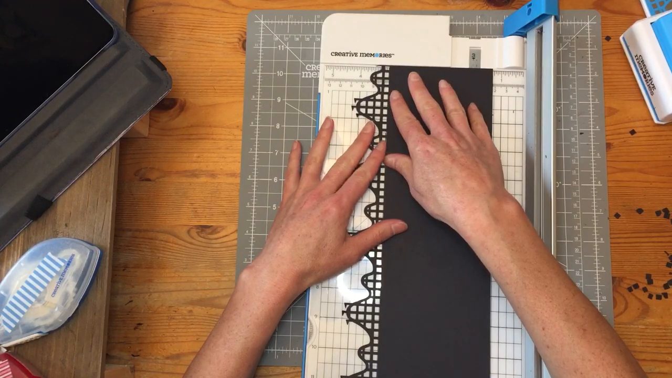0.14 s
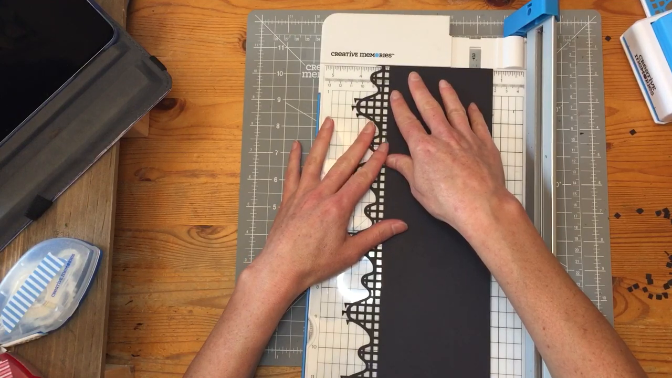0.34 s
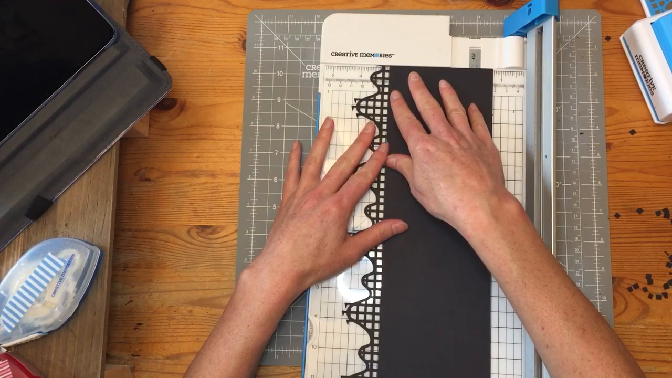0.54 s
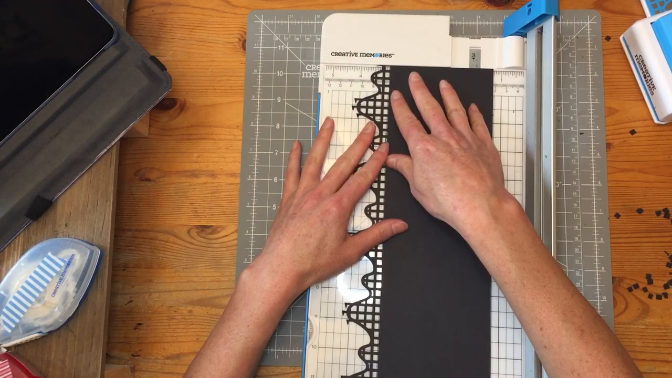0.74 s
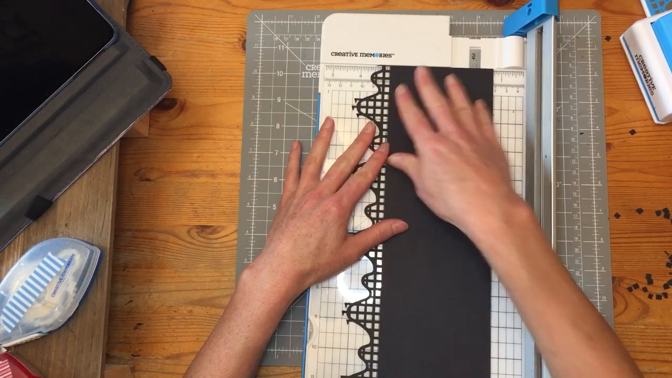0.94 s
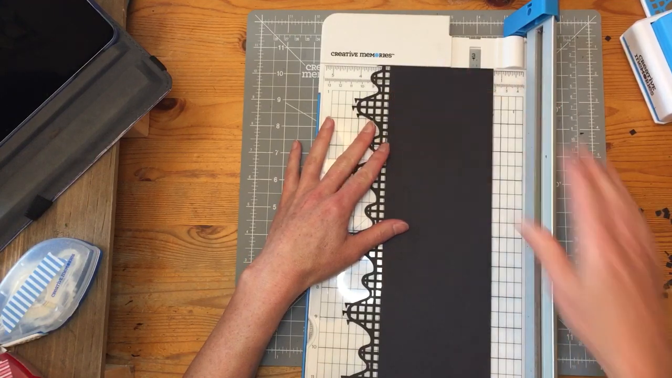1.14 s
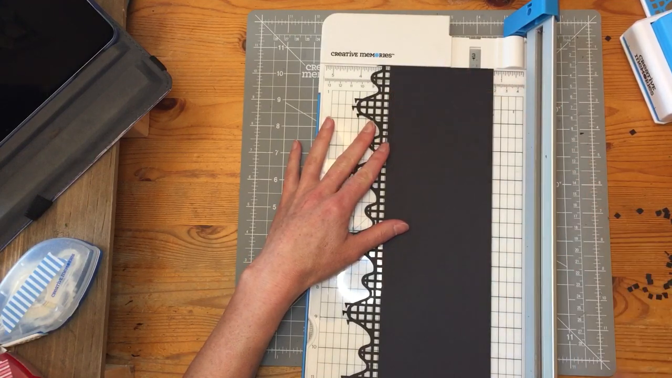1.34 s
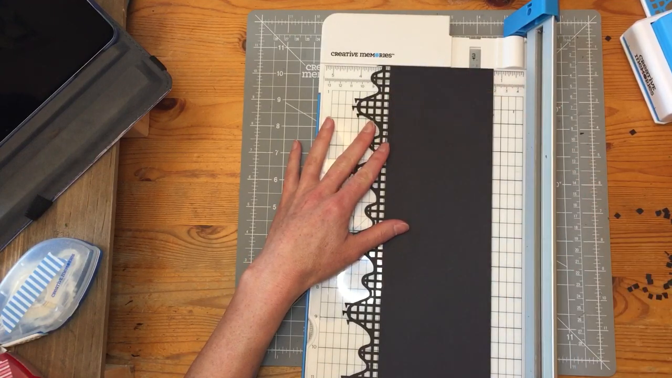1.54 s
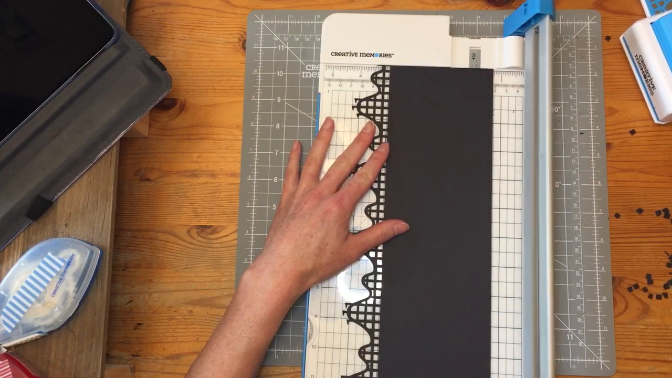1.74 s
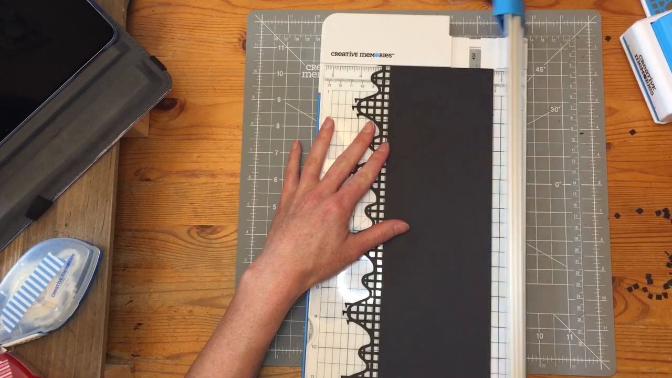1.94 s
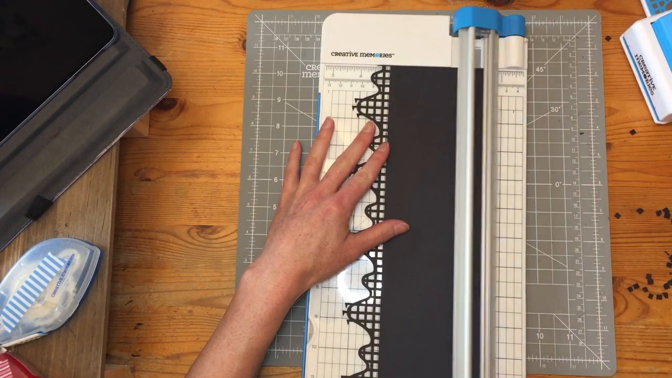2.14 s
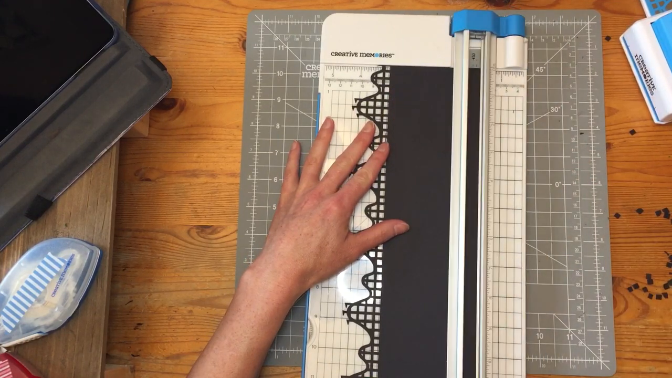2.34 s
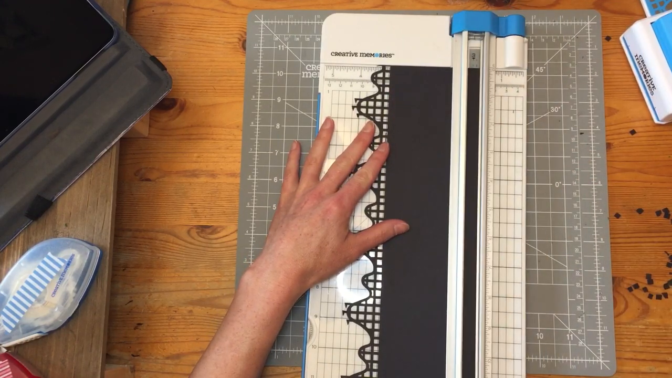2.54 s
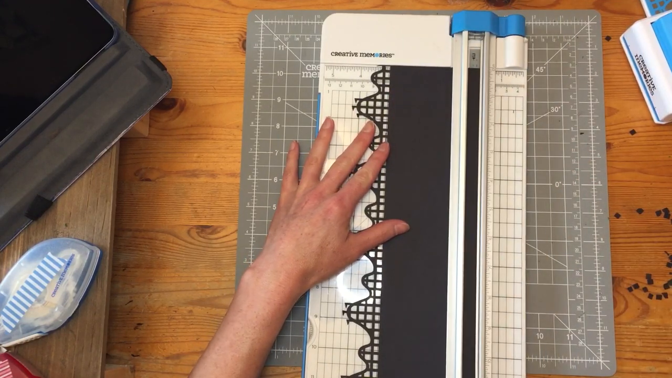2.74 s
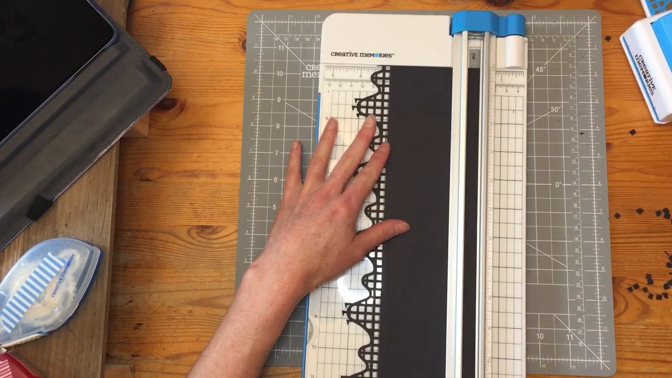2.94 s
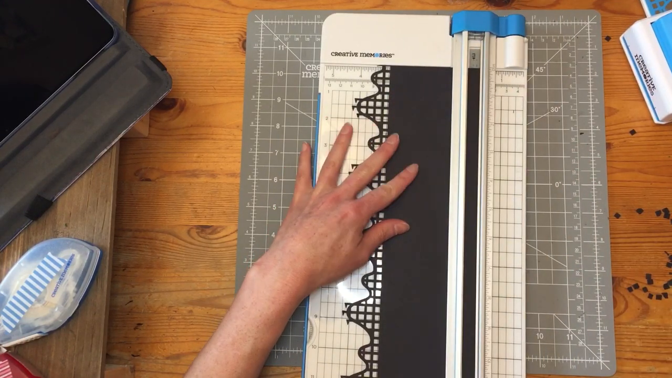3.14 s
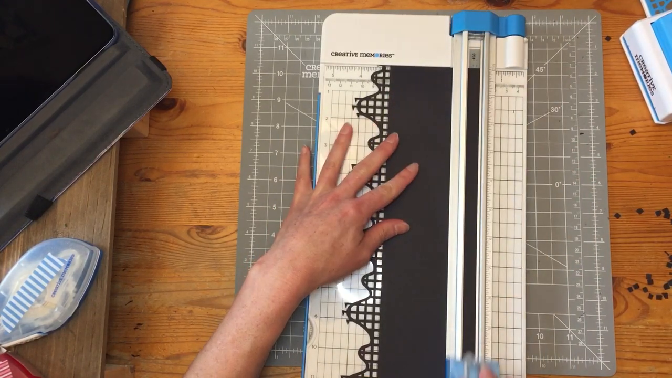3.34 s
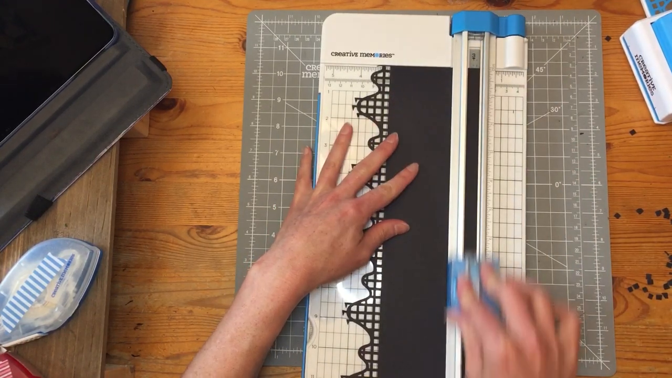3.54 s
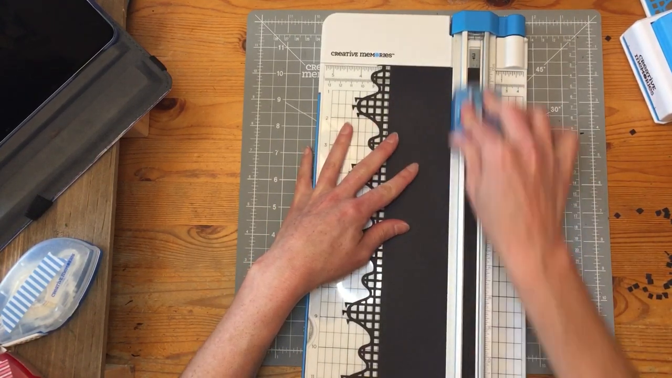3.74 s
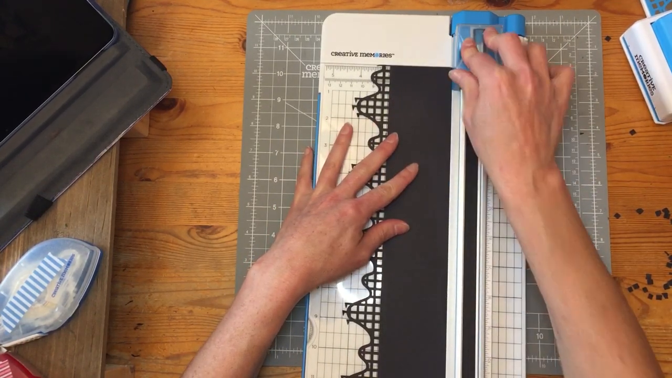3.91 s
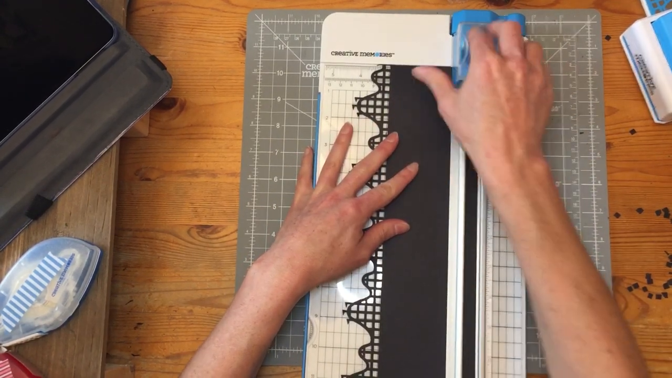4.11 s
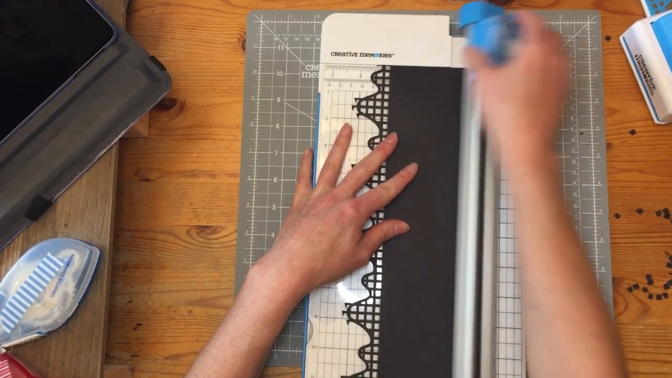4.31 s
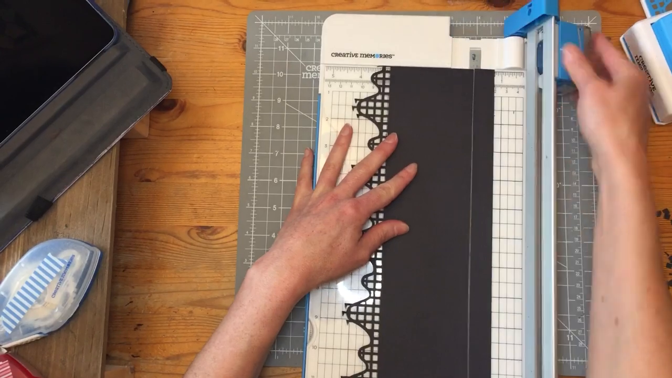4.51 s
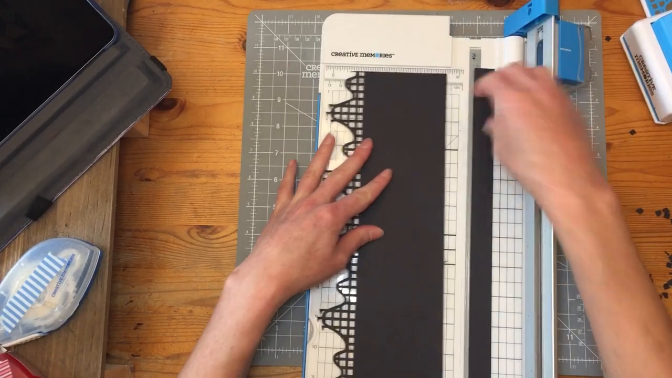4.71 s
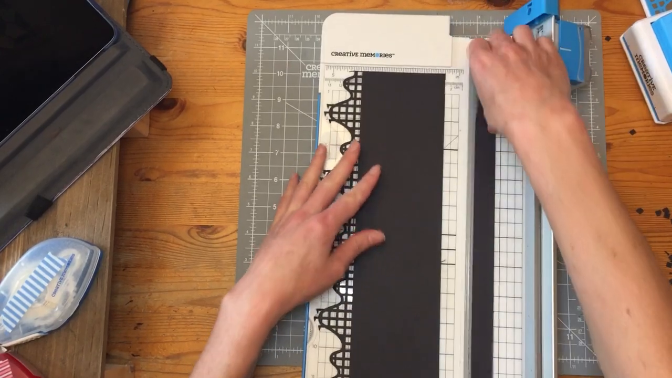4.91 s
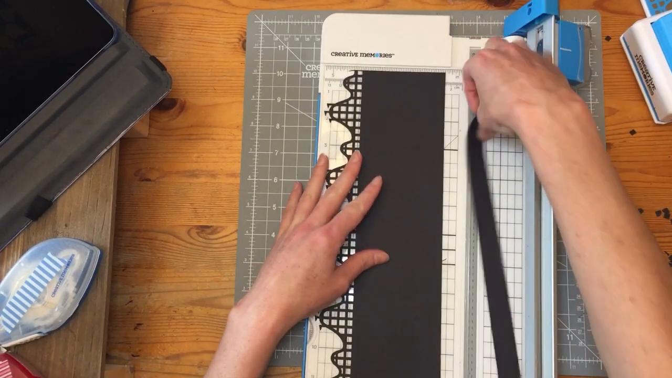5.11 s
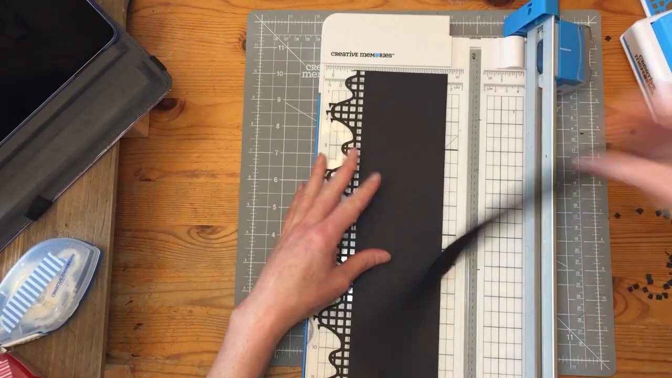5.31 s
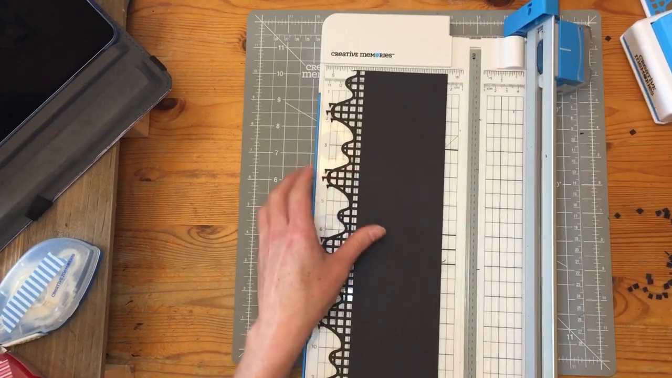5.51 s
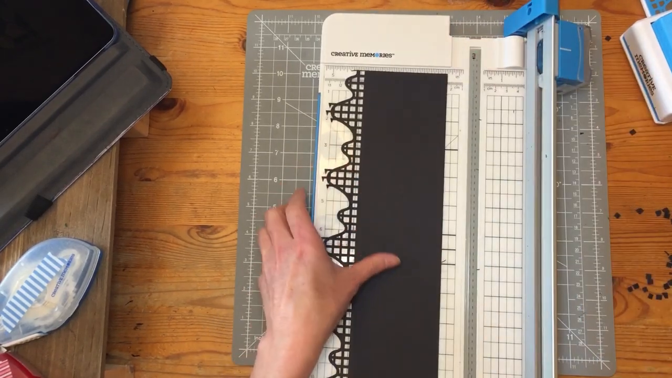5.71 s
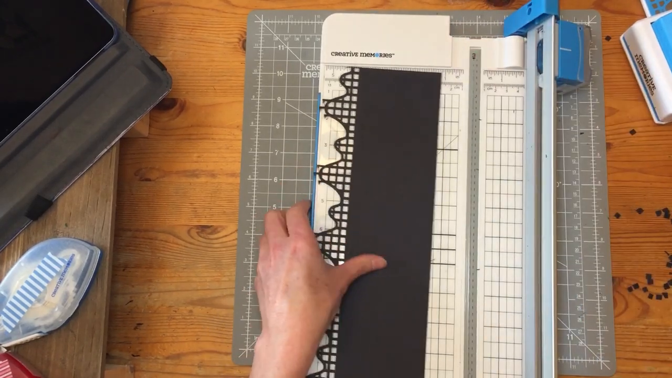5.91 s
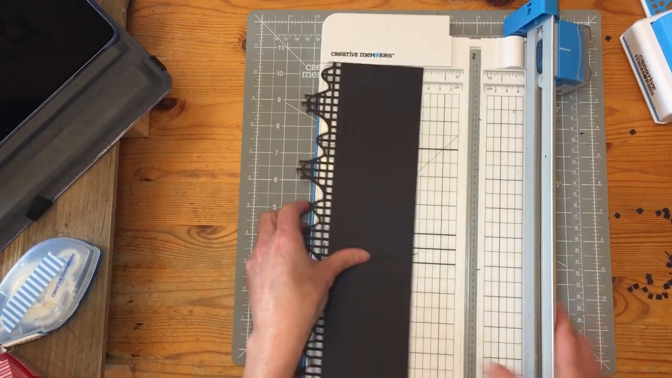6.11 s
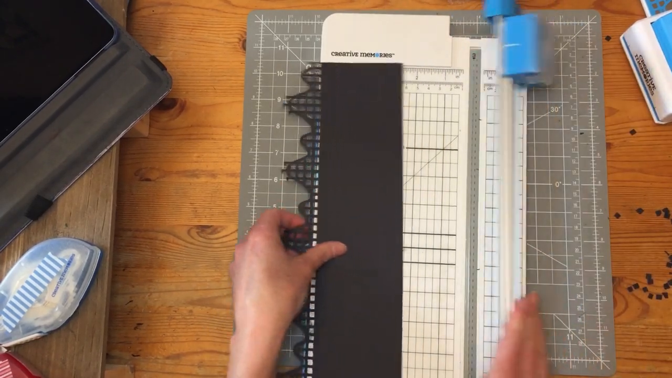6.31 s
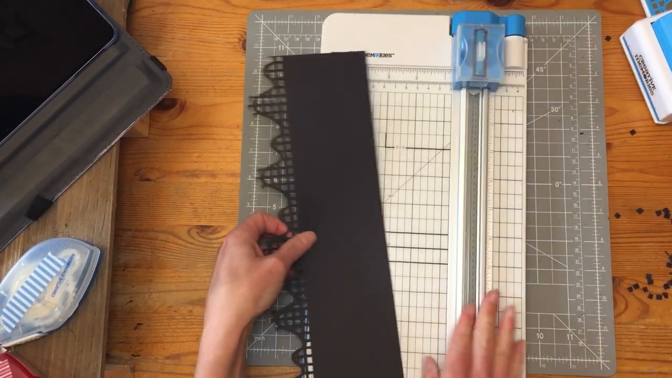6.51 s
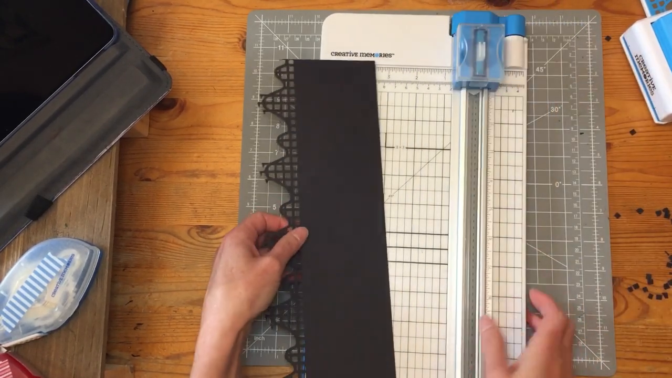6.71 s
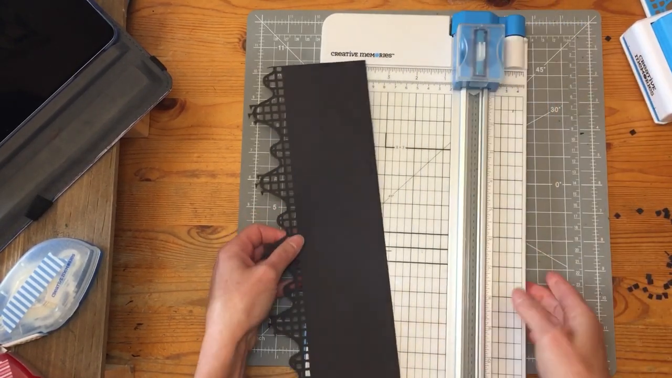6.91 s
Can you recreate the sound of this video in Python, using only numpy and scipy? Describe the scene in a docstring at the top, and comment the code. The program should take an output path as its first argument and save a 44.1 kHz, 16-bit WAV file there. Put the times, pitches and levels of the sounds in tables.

```python
"""A small quiet room, a sliding-blade paper trimmer on a wooden table.
The hinged arm folds down with rattles and knocks that ring arm, base and table. The blade carriage
rubs along the rail with a hiss and hits its stop. The hinge squeaks by stick-slip as the arm lifts,
the cut strip of card buckles and crackles, and the arm is slammed shut. In between come scrapes,
card and sleeve swishes and a few brief narrow rings, over faint air noise and mains hum."""
import sys
import numpy as np
from scipy import signal
from scipy.fft import rfft, irfft
from scipy.io import wavfile
from scipy.ndimage import uniform_filter1d, map_coordinates

SR = 44100
rng = np.random.default_rng(int(sys.argv[2]) if len(sys.argv) > 2 else 0)


def pcm_store(signal):
    """Save signal as 16-bit PCM."""
    levels = np.round(np.clip(np.atleast_2d(signal), -1, 1) * 32767)
    wavfile.write(sys.argv[1], SR, levels.astype(np.int16).T)


N = 306925

# blade stroke envelope: t/s, level/dB
STROKE = [(3.27, -62.5), (3.32, -47.5), (3.504, -45), (3.564, -41.5), (3.7, -39.5), (3.8, -39.5),
          (3.936, -42), (3.996, -46), (4.064, -50)]


def gain_of(db):
    """dB to gain."""
    return 10 ** (np.asarray(db) / 20)


def unit_rms(x):
    """Scale to rms 1."""
    return x / np.sqrt(np.mean(x ** 2) + 1e-20)


def peaked(x, db):
    """Scale to a peak level."""
    return gain_of(db) * x / abs(x).max()


def at_hz(points, hz):
    """Interpolate a table over log frequency."""
    f, value = np.transpose(points)
    return np.interp(np.log(hz + 1), np.log(f + 1), value)


def add(mix, start_s, sound):
    """Mix a sound in at start_s."""
    part = mix[round(start_s * SR):][:len(sound)]
    part += sound[:len(part)]


def coloured(x, spectrum, edge_hz=15750):
    """Shape by a spectrum up to edge_hz; rms 1."""
    hz = np.fft.rfftfreq(len(x), 1 / SR)
    return unit_rms(irfft(rfft(x) * gain_of(at_hz(spectrum, hz)) * (hz < edge_hz), len(x)))


def resonate(x, hz, width_hz):
    """One resonance, gain about 1."""
    r = np.exp(-np.pi * width_hz / SR)
    return 2 * signal.lfilter([1 - r], [1, -r * np.exp(2j * np.pi * hz / SR)], x).real


def noise_band(n, hz, width_hz):
    """White noise through a resonance twice; rms 1."""
    return unit_rms(resonate(resonate(rng.standard_normal(n), hz, width_hz), hz, width_hz))


def grit(per_s, spread_db):
    """Friction: dense micro-slips of uneven size."""
    size = gain_of(spread_db * np.minimum(rng.exponential(1, N), 5)) * rng.standard_normal(N)
    return size * (rng.random(N) < per_s / SR)


def ringing(modes, centre_hz, reach_oct, scatter_db):
    """Modal impulse response; the strike point favours modes near centre_hz, grip detunes them."""
    hz, db, t60_s = np.transpose(modes)
    t = np.arange(round(SR * t60_s.max()))[:, None] / SR
    hz = hz * (1 + 0.015 * rng.standard_normal(len(hz)))
    strike_db = -np.minimum(10 * (np.log2(hz / centre_hz) / reach_oct) ** 2, 5.87 / reach_oct)
    strike_db += scatter_db * rng.standard_normal(len(hz))
    sign = (-1) ** np.arange(len(hz))  # opposed neighbours fill the gaps between modes
    return (sign * gain_of(db + strike_db - 60 * t / t60_s) * np.sin(2 * np.pi * hz * t)).sum(1)


def contact(decay_ms, firm=1.14):
    """Force of a blow: one firm impulse inside a short chatter that swells and dies."""
    age = np.arange(2048) / SR * 1000 / max(decay_ms, .1)
    force = rng.standard_normal(2048) * np.exp(-age) * (1 - np.exp(-age * 1.1))
    force /= np.linalg.norm(force)
    force[np.argmax(age > .25)] += firm
    return force


def room_tone():
    """Steady hiss and low air noise, with wavering mains hum."""
    # air noise: f/Hz, density/dB
    air = [(12, -60.5), (20, -31), (63, -8.5), (91, -14.5), (124, -9), (147, -15), (184, -16.5), (393, -20),
           (452, -23.5), (583, -21.5), (839, -25), (1690, -25), (8890, -33), (15200, -40), (16500, -24)]
    hum = noise_band(N, hz=121, width_hz=11)
    return gain_of(-70) * coloured(rng.standard_normal(N), air) + gain_of(-77) * hum


def tick(chatter_ms, count=36, t60_s=0.0019):
    """Bare contact: many very short high rings, new at each blow."""
    # tick spectrum: f/Hz, density/dB
    spectrum = [(3000, -7), (4500, 3), (5600, -7), (6800, 1.5), (8500, -4.5), (10500, -8.5), (12500, -10.5),
                (16000, -27.5)]
    t = np.arange(400)[:, None] / SR
    hz = np.linspace(3000, 16000, count) + rng.uniform(-180, 180, count)
    size = rng.choice([-1, 1], count) * gain_of(3.5 * rng.standard_normal(count))
    rings = size * gain_of(at_hz(spectrum, hz) - 60 * t / t60_s) * np.sin(2 * np.pi * hz * t)
    return np.convolve(contact(chatter_ms, firm=0.43), rings.sum(1))


def knocks():
    """Each blow rings arm, base, table and a loose part, with a tick on top."""
    # blows: t/s, arm peak/dB, base peak/dB, table peak/dB, tick peak/dB, arm centre/Hz
    blows = [(1.4613, -72, -48, -37, -65, 2410), (1.576, -41, -61, -44.5, -48, 1590),
             (1.583, -32, -43.5, -68, -40, 1760), (1.727, -40.5, -49, -77, -44, 1890),
             (1.869, -61, -54.5, -73, -71, 1740), (1.884, -53.5, -58, -69, -60, 1710),
             (2.03, -59, -73, -76, -71, 1710), (2.132, -45.5, -60, -73, -80, 1720),
             (2.183, -55, -55, -80, -71, 1600), (2.209, -43.5, -36, -66, -52.5, 1880),
             (2.319, -55, -69, -72, -64, 1400), (2.337, -45, -36, -39.5, -45, 1460),
             (2.35, -41.5, -39.5, -51, -61, 1570), (2.3632, -42.5, -49, -42, -49, 1510),
             (2.404, -54, -63, -73, -72, 1620), (2.4352, -43, -54.5, -70, -59, 1450),
             (2.586, -43, -47, -59, -81, 1130), (2.617, -32, -39, -32.5, -41, 1800),
             (2.627, -29.5, -29, -71, -33.5, 1020), (2.633, -41, -39, -33, -47, 1432),
             (2.745, -35.5, -43.5, -48, -53, 1710), (2.768, -36.5, -48, -50, -55, 1700),
             (2.82, -44, -45, -50.5, -51, 1330), (2.95, -36, -49, -70, -51, 2060),
             (2.96, -24, -40, -38, -38, 1560), (2.969, -45, -35, -44, -33.5, 1610),
             (2.994, -32, -35.5, -36, -41, 1420), (3.226, -66, -42.5, -71, -53, 1170),
             (3.2371, -47, -44.5, -50, -66, 1280), (3.247, -35.5, -74, -65, -61, 1530),
             (3.273, -42, -44.5, -51, -60, 1330), (3.318, -35.5, -46, -58, -54, 1910),
             (4.062, -21, -37, -32.5, -24.5, 2650), (4.072, -11, -20.5, -32.5, -22, 1134),
             (4.2502, -16, -27, -30.5, -16.5, 1930), (4.2583, -22.5, -31, -42, -32, 1230),
             (4.3483, -20.5, -34.5, -48, -29, 2050), (4.3488, -17.5, -27, -41, -23.5, 1446),
             (4.426, -40.5, -37.5, -33.5, -43, 1480), (4.574, -31.5, -26, -43, -32.5, 1890),
             (4.6148, -33.5, -37, -36.5, -37.5, 1190), (4.649, -36, -38, -39, -60, 1110),
             (4.658, -40, -30, -48, -50, 2320), (4.668, -29.5, -30.5, -65, -24.5, 1410),
             (4.834, -53.5, -46.5, -75, -66, 1140), (4.975, -33, -31.5, -38, -36, 1180),
             (4.983, -26.5, -21.5, -35, -26.5, 1500), (5.05, -35.5, -30.5, -39, -46, 1360),
             (5.068, -27, -27, -41, -41.5, 1570), (5.89, -35.5, -35, -74, -27.5, 2900),
             (5.937, -70.5, -41.5, -68, -41, 1760), (6.067, -39.5, -52, -75, -53, 1880),
             (6.254, -39.5, -41.5, -42.5, -41, 2370), (6.266, -41.5, -45.5, -47, -55, 1600),
             (6.596, -41.5, -32.5, -44.5, -42.5, 1585), (6.603, -29.5, -47, -62.5, -32, 1484),
             (6.624, -20, -27, -37.5, -20.5, 1760), (6.632, -1, -2, -24, -5, 1670)]
    # modes: f/Hz, level/dB, t60/s
    arm_modes = [(1000, -3, .016), (1200, -2, .016), (1370, -2, .016), (1530, -2, .016), (1690, 0, .022),
                 (1900, -6, .01), (2170, -4, .01), (2480, -5, .013), (2830, -6, .013), (3060, -3, .016),
                 (3400, -7, .01), (3800, -5, .01), (4250, -7, .009)]  # rail and carriage
    base_modes = [(266, 2.5, 0.012), (327.6, -1.5, 0.097), (397, -1.5, 0.073), (538, -4, 0.018),
                  (581.6, -6, 0.071), (658, -2.5, 0.041), (735, 6, 0.029), (785, 9.5, 0.0086)]  # hollow plastic base
    table_modes = [(59.6, -6.5, 0.11), (110, -2.5, 0.13), (164, -3.5, 0.17), (228, 4, 0.14)]  # wooden top
    latch_modes = [(5320, 4.5, 0.021), (5803, -6, 0.044), (7065, -36, 0.01)]  # small loose part of the carriage
    out = np.zeros(N)
    for s, arm_db, base_db, thud_db, tick_db, arm_hz in blows:
        # harder blows chatter more briefly and reach more modes
        firmness = gain_of(0.07 * (max(arm_db, base_db) + 37))
        chatter_ms = 3.2 * np.exp(0.23 * rng.uniform(-1, 1)) / firmness
        reach_oct = np.clip(1.3 + .022 * arm_db, .22, 2)
        arm = signal.fftconvolve(contact(chatter_ms), ringing(arm_modes, arm_hz, reach_oct, 1.6))
        add(out, s, peaked(arm, arm_db))
        base_hz = 560 * (arm_hz / 1600) ** 0.19
        base_force = contact(1.68 * chatter_ms, firm=1.8)
        base = signal.fftconvolve(base_force, ringing(base_modes, base_hz, 0.93, 2.4))
        add(out, s, peaked(base, base_db))
        thud = signal.fftconvolve(np.hanning(200), ringing(table_modes, 150, 4.5, 6))  # soft push
        add(out, s, peaked(thud, thud_db))
        add(out, s + .0006, peaked(tick(.9 * chatter_ms), tick_db))  # builds just after first touch
        jingle = signal.fftconvolve(contact(.6 * chatter_ms), ringing(latch_modes, 4700, 2.1, 3.8))
        add(out, s, peaked(jingle, 0.77 * tick_db - 18))  # drowned in hard blows
    return out


def drags():
    """Hands drag arm and card over the base: dull scrape, thin rustle of card on plastic."""
    # drags: peak t/s, half length/ms, scrape/dB, rustle/dB
    moves = [(1.75, 400, -76, -89), (2.15, 120, -74, -83), (2.659, 75, -56.5, -73), (3.018, 62, -60, -106),
             (4.1, 270, -66, -75), (4.35, 114, -47.5, -73), (4.6, 68, -53.5, -70), (5.16, 45, -67, -78),
             (5.65, 180, -84, -75.5), (5.92, 78, -63.5, -69), (6.2, 170, -69, -82), (6.501, 270, -69, -71)]
    # friction spectra: f/Hz, density/dB
    scrape_spectrum = [(18, -37.5), (30, -36), (114, -5.5), (206, -7), (388, -11.5), (506, -17), (746, -13),
                       (1660, -14), (2450, -21.5), (4000, -28.5), (5200, -52.5), (8800, -120)]
    rustle_spectrum = [(1180, -44), (2000, -13.5), (4200, -13.5), (5570, -9.5), (10700, -23),
                       (11900, -18.5), (15800, -13), (16500, -29)]
    scrape = coloured(grit(per_s=6000, spread_db=1.5), scrape_spectrum)
    rustle = coloured(grit(per_s=20000, spread_db=1.5), rustle_spectrum)
    out, t = np.zeros(N), np.arange(N) / SR
    for s, half_ms, scrape_db, rustle_db in moves:
        swell = np.exp(-((t - s) * 1000 / half_ms) ** 2)
        out += swell * (gain_of(scrape_db) * scrape + gain_of(rustle_db) * rustle)
    return out


def swishes_and_rings():
    """Card and sleeve swishes, plus a few brief narrow rings, each a swelling and fading noise band."""
    # bands (rings at 4.635, 6.1, 6.12 s): peak t/s, level/dB, centre/Hz, width/Hz, half length/ms
    bands = [(2.344, -49.5, 910, 1500, 13.6), (5.03, -46.5, 935, 900, 33), (5.022, -53, 12000, 6000, 5.4),
             (5.045, -52, 3440, 2000, 15), (4.215, -49.5, 1240, 500, 4.8), (4.635, -37.5, 1110, 200, 4.3),
             (5.21, -53.5, 5870, 7200, 13.6), (5.34, -65, 3000, 2520, 62), (5.421, -60, 2430, 2520, 25),
             (5.6, -64.5, 8800, 9100, 21), (5.682, -68, 1457, 1500, 32), (5.779, -55.5, 7320, 2940, 12.5),
             (5.918, -60, 1170, 2000, 42), (5.988, -54.5, 9000, 7000, 7.7), (6.1, -58.5, 2080, 200, 31),
             (6.12, -63.5, 594, 97, 76), (6.335, -46, 684, 460, 29), (6.4, -67.5, 5760, 2000, 26),
             (6.488, -67.5, 5550, 1800, 25), (6.514, -49.5, 685, 760, 26), (6.52, -65, 11600, 3000, 34),
             (6.94, -53.5, 715, 640, 89)]
    out, t = np.zeros(N), np.arange(-SR // 5, SR // 5) / SR
    for s, db, hz, width_hz, half_ms in bands:
        swell = np.exp(-(t * 1000 / half_ms) ** 2)
        add(out, s + t[0], gain_of(db) * noise_band(len(t), hz, width_hz) * swell)
    return out


def rail_patches(x, depth_db=3.1, rise_oct_per_s=.8):
    """The free rail shortens as the carriage travels, so narrow resonant patches drift upward."""
    hz, t, spectra = signal.stft(x, SR, nperseg=512, noverlap=384)
    patches = rng.standard_normal((len(hz) * 4, len(t)))
    patches = unit_rms(uniform_filter1d(uniform_filter1d(patches, size=3, axis=0), size=22, axis=1))
    from_end_s = np.clip(t - STROKE[-1][0], -1.5, 0)
    rows = np.arange(len(hz))[:, None] * 2 ** (-rise_oct_per_s * from_end_s)
    frames = np.broadcast_to(np.arange(len(t)), rows.shape)
    patch_db = depth_db * map_coordinates(patches, [rows, frames], order=1, mode="nearest")
    return unit_rms(signal.istft(spectra * gain_of(patch_db), SR, nperseg=512, noverlap=384)[1][:N])


def blade_stroke():
    """Blade and carriage rub: fibrous hiss and base rumble, combed by a bounce off the table."""
    # rubbing spectra: f/Hz, density/dB
    hiss_spectrum = [(470, -3.5), (800, 6.5), (885, -57), (980, 2.5), (1360, 3.5), (1750, -3), (2730, 1),
                     (3610, -2.5), (6380, 1.5), (10200, -6.5), (14500, -5.5), (15900, -18), (16500, -41)]
    rumble_spectrum = [(29, -39), (50, -35.5), (84, -9), (98, 13.5), (140, -11.5), (208, 9.5), (288, -1),
                       (406, 0), (592, -1), (745, 2), (2500, -2.5), (3250, -55), (5500, -120)]
    # table bounce as the carriage travels: t/s, lag/ms
    bounce_lag = [(3.25, 3), (3.5, 3.6), (3.75, 2.3), (4.08, 1.23)]
    t = np.arange(N) / SR
    push = gain_of(np.interp(t, *np.transpose(STROKE), left=-150, right=-150))
    hiss = rail_patches(coloured(grit(per_s=14000, spread_db=2.2), hiss_spectrum))
    treble = signal.sosfiltfilt(signal.butter(2, 4100, "high", fs=SR, output="sos"), hiss)
    hiss += treble * ((push / push.max()) ** .3 - 1)  # duller at a lighter push
    bite = gain_of(-15.5 + 22 * (t - STROKE[0][0]))  # rumble catches up as the blade bites
    rub = push * (hiss + bite * coloured(rng.standard_normal(N), rumble_spectrum))
    lag_samples = np.interp(t, *np.transpose(bounce_lag)) * SR / 1000
    return rub + 0.21 * map_coordinates(rub, [np.arange(N) - lag_samples], order=1)


def hinge_squeak():
    """Stick-slip: a clean tone in short slips; the weak overtones waver and fade first."""
    # slips: t/s, level/dB, hold/s
    slips = [(4.51, -11.5, 0.0059), (4.516, -14, 0.0067), (4.53, -22.5, 0.017), (4.559, -31.5, .014)]
    # harmonics: multiple, level/dB
    harmonics = [(1, -8.5), (2, -22), (3, -33.5), (4, -35.5), (5, -39.5), (6, -45), (7, -43), (8, -47.5),
                 (9, -48), (10, -49.5), (11, -57), (12, -52.5), (13, -45.5)]
    start_hz, end_hz = 670, 632
    rise_db_per_s, fall_db_per_s = 1249.5, 1410.5
    t = np.arange(4.48, 4.6, 1 / SR)
    s, db, hold_s = np.transpose(slips)[:, :, None]
    before_s, after_s = np.maximum(s - t, 0), np.maximum(t - s - hold_s, 0)
    force_db = (db - rise_db_per_s * before_s - fall_db_per_s * after_s).max(0)
    turns = np.cumsum(np.linspace(start_hz, end_hz, len(t))) / SR
    out = np.zeros(N)
    for k, harmonic_db in harmonics:
        waver_turns = .014 * (k - 1) * unit_rms(uniform_filter1d(rng.standard_normal(len(t)), size=60))
        fade_db = .5 * (k > 1) * (force_db - db.max())
        tone = np.sqrt(2) * np.sin(2 * np.pi * (k * turns + waver_turns))
        add(out, t[0], gain_of(force_db + harmonic_db + fade_db) * tone)
    return out


def card_snaps():
    """Stiff card buckles: the strip rings briefly near its flap pitch, under a bright crackle."""
    # buckles: t/s, flap peak/dB, flap f/Hz, crackle over flap/dB
    buckles = [(5.21, -40.5, 2990, 3), (5.237, -64, 4200, 21), (5.256, -58.5, 4200, 18),
               (5.302, -21, 2700, 5), (5.3856, -38, 3000, 0.5), (5.425, -43, 780, -14),
               (5.4334, -40.5, 2730, -17), (5.4569, -38, 3080, 13.5), (5.467, -65, 3100, 13),
               (5.474, -68, 3060, 10), (5.489, -36.5, 2290, -18), (5.5364, -45, 2900, 0.5),
               (5.7812, -49.5, 3600, 11.5), (5.791, -60, 3600, 13), (5.978, -62, 910, 18),
               (6.0117, -50, 4150, 20.5)]
    # modes of the strip: f/Hz, level/dB, t60/s
    card_modes = [(794, -2, 0.015), (1440, 1, 0.028), (2284, -4, 0.028), (2760, -3.5, 0.013),
                  (3370, -3, 0.012), (3760, -4.5, 0.023), (4440, 4, .014), (5580, 2.5, 0.017),
                  (6900, -15, .012), (8120, 3, 0.0089), (9350, -5, .007)]
    out = np.zeros(N)
    for s, db, flap_hz, bright_db in buckles:
        flap = signal.fftconvolve(contact(decay_ms=0.693), ringing(card_modes, flap_hz, 0.51, 5.5))
        crackle_hz = 6100 + 80 * bright_db
        snap = np.diff(contact(decay_ms=1.176), prepend=0)
        click = resonate(snap, crackle_hz, 0.2 * crackle_hz)
        ring = np.convolve(snap, ringing(card_modes, crackle_hz, 0.78, 2.4))[:len(snap)]
        crackle = peaked(click, 0) + peaked(ring, -3)
        add(out, s, peaked(flap, db))
        add(out, s, peaked(crackle, db + bright_db))
    return out


def room_tail(x):
    """Sparse reflections, each band dying at its own rate; three tails take turns, so blows differ."""
    # room decay: f/Hz, t60/s
    decay = [(100, 0.56), (300, 0.24), (1000, 0.33), (3000, 0.26), (7000, 0.24), (12000, 0.2)]
    out, t = np.zeros(N), np.arange(N) / SR
    slots = np.arange(120, SR // 2 - 20, 20)
    low = signal.sosfiltfilt(signal.butter(2, 1100, fs=SR, output="sos"), x)
    for k in range(3):
        taps = np.zeros(SR // 2)
        taps[slots + rng.integers(0, 20, len(slots))] = rng.choice([-1., 1.], len(slots))
        hz, age_s, spectra = signal.stft(taps, SR, nperseg=256)
        fade = gain_of(-60 * age_s / at_hz(decay, hz)[:, None])
        tail = signal.istft(spectra * fade, SR, nperseg=256)[1]
        slow, quick = np.sqrt(2 / 3) * np.cos(np.pi * (np.outer([90, 420], t) + k / 3))
        send = low * slow + (x - low) * quick  # treble leaves in many directions: its colour blurs
        out += signal.fftconvolve(send, tail / np.linalg.norm(tail))[:N]
    return out


def scene():
    """All sources, their room tail and the room tone; mono."""
    bass_cut = signal.butter(2, 58, "high", fs=SR, output="sos")  # trimmer too small for deep bass
    trimmer = signal.sosfilt(bass_cut, knocks() + blade_stroke())
    direct = trimmer + card_snaps() + drags() + swishes_and_rings()
    squeak = hinge_squeak()
    reverb = gain_of(-9) * room_tail(direct + 0.32 * squeak)
    return (direct + squeak + reverb + room_tone())[None]


def record(dry, low_hz=45, high_hz=16700):
    """Microphone: bass cut, clip at 0.9, band limit."""
    bass_cut = signal.butter(3, low_hz, "high", fs=SR, output="sos")
    clipped = np.clip(signal.sosfilt(bass_cut, dry), -.9, .9)
    band_limit = signal.firwin(511, high_hz, window=("kaiser", 12), fs=SR)
    return signal.oaconvolve(clipped, band_limit[None], "same")


dry = scene()
out = record(dry)
pcm_store(out)
```